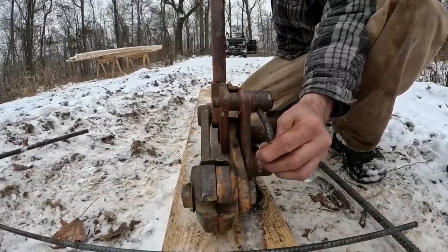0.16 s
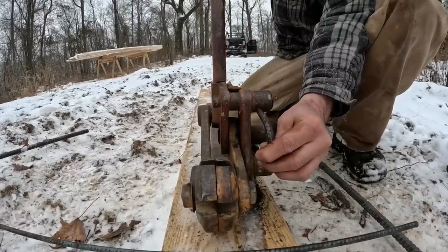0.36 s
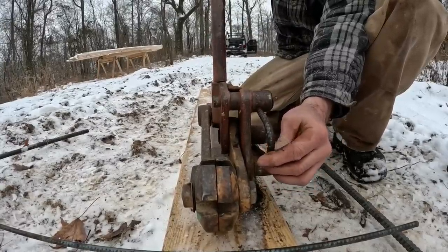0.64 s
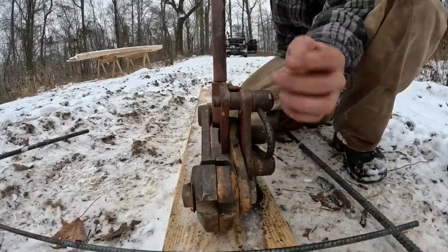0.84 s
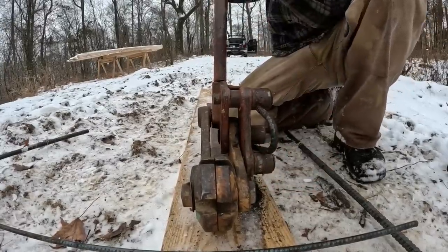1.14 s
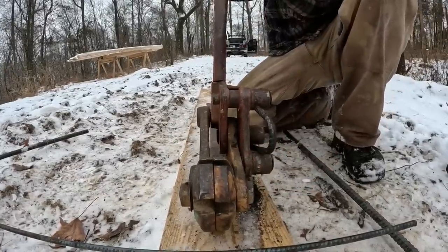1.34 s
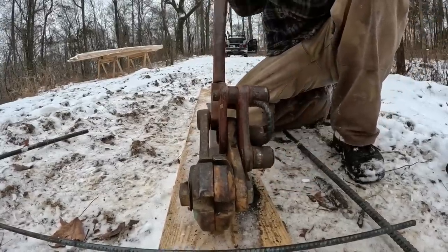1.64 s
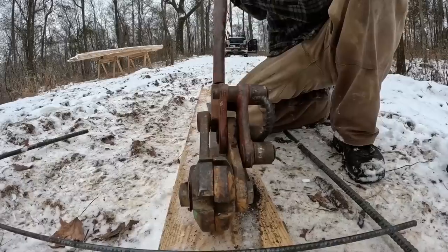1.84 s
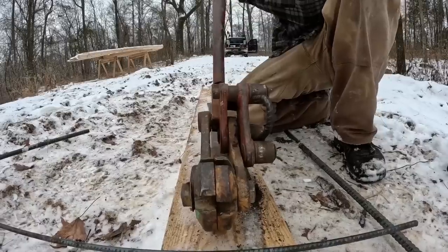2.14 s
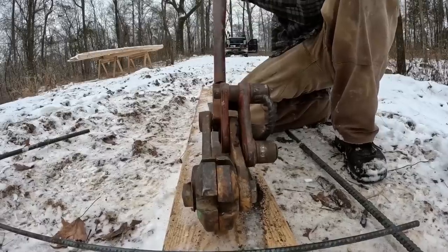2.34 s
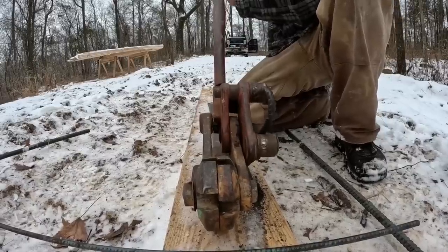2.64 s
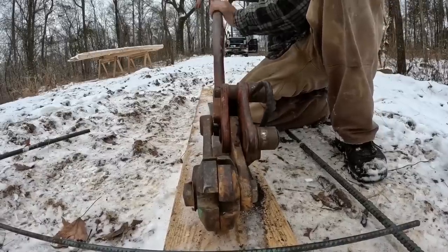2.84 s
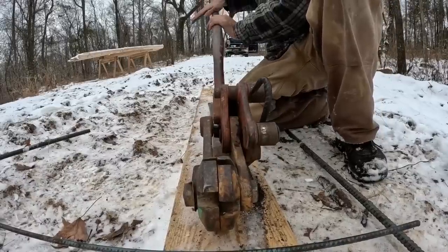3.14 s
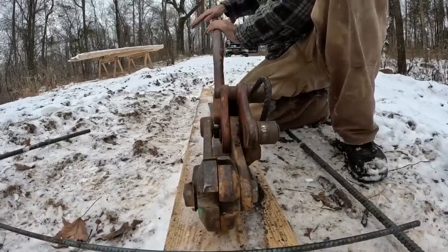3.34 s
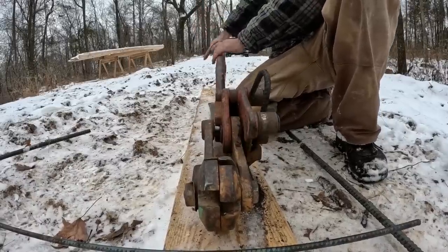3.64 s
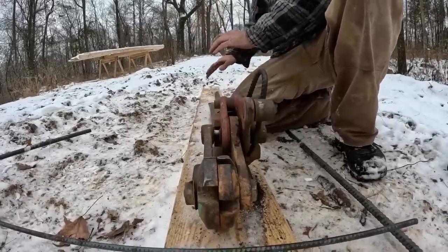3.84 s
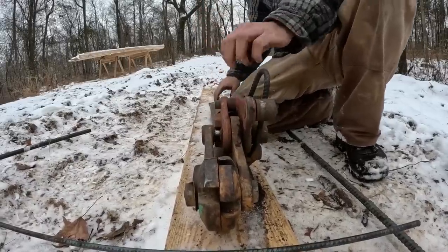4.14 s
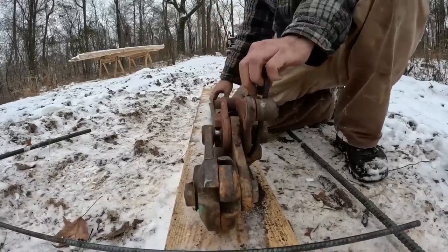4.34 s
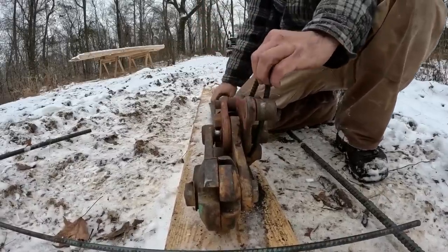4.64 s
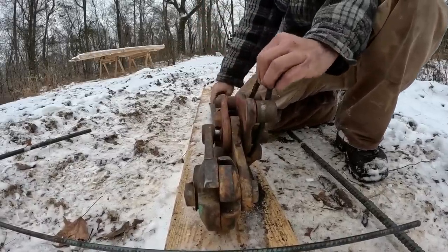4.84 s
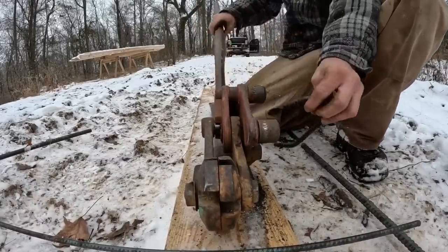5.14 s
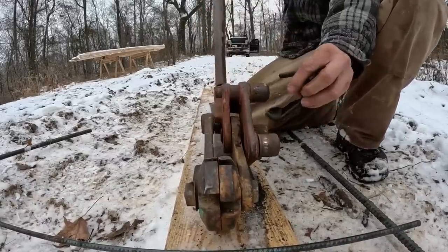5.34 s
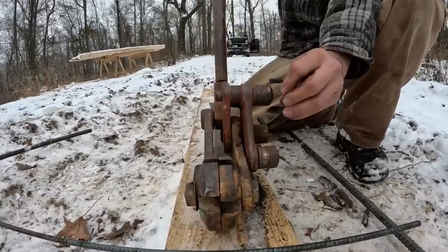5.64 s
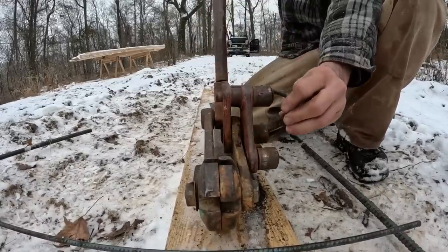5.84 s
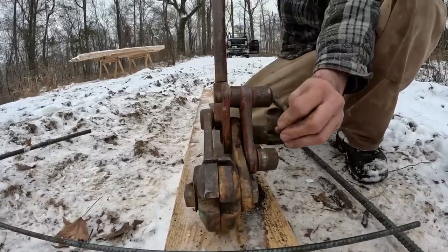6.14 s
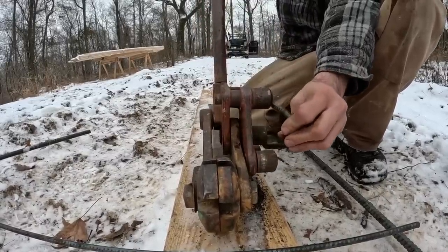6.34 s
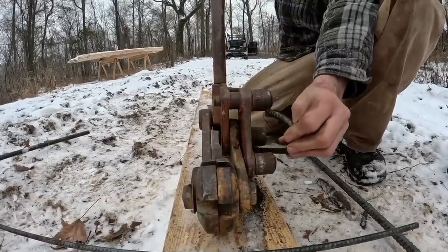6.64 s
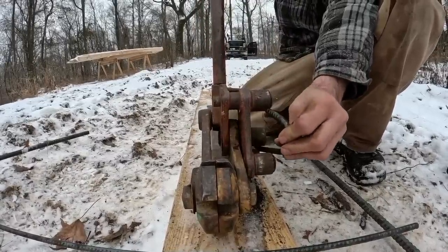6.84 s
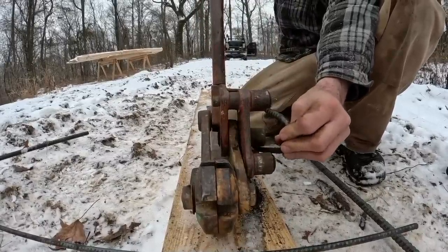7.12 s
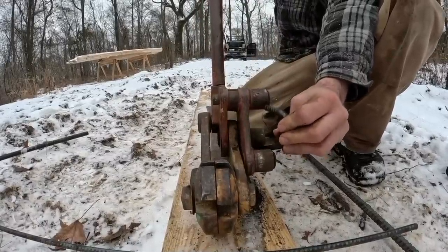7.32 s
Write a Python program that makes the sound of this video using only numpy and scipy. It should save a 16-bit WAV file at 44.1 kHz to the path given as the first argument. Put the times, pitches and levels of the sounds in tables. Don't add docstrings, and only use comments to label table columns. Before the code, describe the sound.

A close microphone beside a steel bender bolted to a plank on frozen ground, with a very faint open-air wash. From 0 to 1 s, light taps, woody creaks and dry rustling; a distant hoarse hawk scream falls at about 0.4-0.8 s. At 1.06 s a very loud steel crack hits with a plank knock and ground thump, followed by irregular jerks, rib ticks and grinding until 2.57 s, with another strong knock near 2.5. Friction continues low, fading by 3. From 3.55 to 3.9 s the lever drops: a loud burst of bouncing clatter, thumps, skid and short metallic ringing, with a faint tree echo. Quiet handling follows at 4.3-4.9 s, ending in a small clink and scrape. A clear metal knock comes at 5.52 s, a short far hawk call at 5.95, then soft clinks, uneven sliding on pins, grit snaps, taps and rustle until 7.4 s.

```python
import sys
import numpy as np
from scipy import signal
from scipy.fft import rfft, irfft
from scipy.io import wavfile
from scipy.ndimage import uniform_filter1d

SR = 44100
rng = np.random.default_rng(int(sys.argv[2]) if len(sys.argv) > 2 else 0)


def to_wav(sig):
    pcm = np.clip(np.atleast_2d(sig), -1, 1) * 32767
    pcm = np.round(pcm).astype(np.int16)
    wavfile.write(sys.argv[1], SR, pcm.T)


def level_to_linear(level):
    exponent = np.asarray(level, float) / 20
    return 10 ** exponent


N = 329868
T = np.arange(N) / SR

# [t/s, level/dB, strongest f/Hz]
BAR_KNOCKS = [(1.064, -6.5, 421), (1.088, -11.5, 281), (1.136, -14, 792), (1.154, -18.5, 844),
              (1.194, -23, 563), (1.292, -15, 873), (1.334, -23, 760), (1.368, -22.5, 804),
              (1.406, -18, 563), (1.626, -16.5, 558), (1.694, -10, 690), (1.86, -25, 666),
              (1.913, -17.5, 560), (1.984, -11.5, 616), (2.101, -20, 801), (2.119, -23.5, 542.5),
              (2.164, -19, 395), (2.281, -29.5, 640), (2.32, -14, 800), (2.397, -24, 546), (2.485, -7, 816),
              (2.517, -21, 792), (2.57, -24.5, 560)]
LEVER_BOUNCES = [(3.566, -19, 943.5), (3.581, -8, 868.7), (3.586, -7.5, 524.5), (3.609, -7, 262.7),
                 (3.653, -16.5, 619), (3.661, -7, 819), (3.727, -15, 741), (3.756, -9.5, 732.3),
                 (3.774, -10, 901.4), (3.788, -3, 808), (3.847, -21.5, 638), (3.907, -17.5, 825),
                 (3.914, -19.5, 354.6)]
HAND_TAPS = [(0.145, -34.5, 673.2), (0.868, -28.5, 856), (3.194, -37, 295.3), (4.504, -55, 690),
             (4.542, -48.5, 1056), (5.516, -29, 659), (5.561, -38, 834.5), (5.683, -63, 1080),
             (5.74, -56, 863), (6.128, -36.5, 712), (6.256, -38.5, 779), (6.52, -32, 768.5),
             (6.549, -32, 753), (6.64, -45, 793), (6.749, -27.5, 560), (7.118, -35.5, 684)]
# [t/s, level/dB, f/Hz]
CREAKS = [(0.168, -34.5, 696), (0.176, -26, 693), (0.195, -27, 685), (0.232, -37.5, 668), (0.554, -43, 702),
          (0.577, -49.5, 700), (0.66, -44, 691), (0.682, -43.5, 713), (0.725, -49.5, 715),
          (0.849, -38, 702), (0.932, -40.5, 805), (1.008, -39.5, 830), (1.11, -23.5, 750),
          (1.124, -22.5, 804), (1.228, -35, 820), (1.316, -30, 850), (1.34, -30.5, 795), (1.684, -25, 748),
          (1.701, -19.5, 797), (2.458, -22, 803), (6.733, -33, 617), (6.812, -37.5, 759)]
# [t/s, level/dB]
THUMPS = [(0.193, -44), (1.067, -19), (1.403, -39), (1.649, -44), (1.913, -40.5), (1.985, -37.5),
          (2.171, -37.5), (2.481, -36.5), (3.583, -17.5), (3.665, -23), (3.722, -20), (3.757, -29),
          (3.778, -18), (3.903, -23), (5.919, -47.5), (6.749, -46)]
# [f/Hz, level/dB, t60/s]
PLANK_MODES = [(252, -2.5, 0.039), (318, -5.5, .06), (372, 0.5, 0.043), (476, -9.5, 0.071),
               (560, 0.5, 0.048), (680.6, 0.5, 0.055), (772.4, -3, 0.078), (832.5, 0.5, 0.041),
               (1050, -18, 0.19)]
GROUND_MODES = [(84.4, -2, 0.47), (149, -3, 0.048), (185, -3.5, 0.21)]
GROAN_MODES = [(281, -3, 0.056), (742.8, 0.5, 0.041), (820, -0.5, .06)]

# [t/s, level/dB, ping/dB, treble/dB]
CRACKS = [(1.0626, 2, -25, -6.5), (1.0676, -1.5, -23, 2.5), (1.0906, -23.5, -18, 1.5),
          (3.467, -48, -12, -1.5), (3.5446, -47.5, -10, -1.5), (3.555, -35, -4.5, -2),
          (3.566, -18.5, -16.5, -8.5), (3.5768, -9, -14, -10), (3.5871, 3.5, -18.5, -4),
          (3.6606, -39.5, 7, -0.5), (3.7232, -30.5, -14, -20), (3.7414, -37.5, -7.5, -11),
          (3.7556, -28.5, -5.5, -27), (3.778, -19.5, -3.5, -13), (3.787, -1.5, -3.5, -17.5),
          (3.9048, -18, -3.5, -32)]
# [t/s, level/dB, ping/dB]
RIB_SLIPS = [(1.135, -27, -10.5), (1.1944, -33.5, 9), (1.293, -48, 13), (1.3339, -30.5, -4),
             (1.3688, -38, 12.5), (1.4051, -32.5, 2), (1.5905, -36.5, 4.5), (1.6242, -35, -5),
             (1.6943, -29, -12), (1.8592, -42.5, 16.5), (1.9095, -38.5, 5.5), (2.119, -33, 8),
             (2.164, -36.5, 3), (2.3203, -40.5, 7.5), (2.396, -33, 12), (2.471, -37.5, -3),
             (2.4843, -31.5, 1), (2.5676, -42, 8.5)]
PIN_TICKS = [(4.5067, -44, 1.5), (4.5422, -47, 4.5), (4.6119, -54.5, 8), (4.9235, -42.5, -12),
             (5.5159, -30, 5.5), (5.5609, -28.5, -3), (5.6817, -47.5, 8.5), (5.7375, -52.5, 13),
             (6.1317, -34, -17), (6.2573, -37, -4), (6.4126, -46, -7), (6.4544, -57, -11.5),
             (6.5192, -38, -10), (6.55, -31, -8.5), (7.1167, -48, -3)]
# [f/Hz, level/dB]
CRACK_COLOUR = [(710, -26), (1200, -11), (1720, -3), (2530, -8.5), (3180, -5), (4650, -15), (5180, -2.5),
                (6300, -6), (9010, -23), (10600, -2.5), (11700, -28.5), (14800, -26), (16000, -31.5)]
# [f/Hz, level/dB, t60/s]
ROLLER_MODES = [(1865, -3.5, 0.025), (2070, -6, 0.0017), (1200, -2, 0.013)]
HELD_BAR_MODES = [(800, -3, .014), (1150, -.1, .016), (1500, -3, .01), (2000, -4, .01)]
CLAMPED_BAR_MODES = [(2821, -4, 0.07), (4936, -13, 0.08), (6137, -22, 0.08), (7445, -5, 0.065),
                     (10230, 0, 0.08), (12870, -25, 0.08), (13770, -25, 0.07)]
LEVER_MODES = [(1626, 31.5, 0.033), (2480, -10, 0.13), (3130, -15, .2), (3930, -6.5, 0.16),
               (4270, -4, 0.11), (4850, -6.5, 0.17), (5771, -15.5, 0.1)]
PIN_MODES = [(2550, -2, .012), (3000, 0.5, .012), (3500, -5, 0.0075)]
# [t/s, level/dB, f/Hz, t60/s]
LONG_RINGS = [
    (1.066, -31, 11140, .12),
    (3.587, -55, 9420, .4),
]
# [t/s, level/dB, f/Hz, t60/s]
SINGLE_NOTES = [(0.168, -42, 1655, .08), (1.065, -15.5, 699, 0.026), (1.1355, -9, 780, 0.011),
                (3.467, -48.5, 5145, .02), (3.665, -50.5, 6933, 0.016), (3.7216, -7.5, 560, 0.012),
                (3.733, -49, 4793, 0.022), (3.742, -44, 6960, .02), (3.766, -30.5, 2718, .02),
                (3.777, -25.5, 2710, 0.046), (3.7922, -12, 400, 0.033), (3.793, -39, 5763, .03),
                (3.8, -45.5, 4974, .15), (3.81, -50.5, 4238, 0.12), (3.912, -58, 6300, 0.025),
                (3.95, -80.5, 7670, .3), (1.115, -57.5, 7600, 0.14), (1.35, -58, 4600, .3),
                (1.3, -32, 300, 0.047), (1.411, -29.5, 332.6, 0.055), (3.907, -20, 383.6, 0.066),
                (2.44, -26, 798, 0.055), (2.72, -37, 228.3, 0.089), (2.715, -33, 806.3, 0.069),
                (5.5172, -24.5, 1950, 0.027), (5.95, -49, 170, 0.1), (6.549, -39.5, 193.3, 0.05),
                (7.001, -58.5, 60, 0.19), (3.882, -34, 493.7, 0.03), (3.898, -28, 799, .02),
                (5.517, -26, 1160, .04), (5.741, -62, 4425, .2), (6.551, -52, 10250, 0.038),
                (6.636, -57.5, 10200, 0.038)]

# [t/s, second mode level/dB, then lowest, middle, fifth modes above it/dB]
CLINKS = [
    (4.924, -26.5, -27, -9.5, -2.5),
    (5.5171, -23, -28.5, -30.5, -13.5),
    (5.563, -42, -3, -7, -10),
    (5.7367, -69, 11.5, -2.5, 9),
    (6.41, -46.5, -18.5, -7, -25.5),
    (6.4546, -44.5, -27, -7, -13),
]
# [f/Hz, level/dB, t60/s]
STIRRUP_MODES = [(1314, -22, 0.21), (2363, -2, 0.16), (2864, -16, 0.31), (3268, -11, 0.1), (4425, 0, 0.09),
                 (6390, -27, 0.12), (7267, -39, 0.29), (9986, -31, 0.22), (10200, -24, 0.063),
                 (11040, -32, 0.3), (12960, -38, 0.11), (13800, -59, 0.12)]
RUBBED_MODES = [(2363, 0, .035), (2864, -1, .03), (3268, -3, .03), (4425, -8, .07), (6390, -21, .08),
                (7267, -22, .12), (10100, -22, .05), (11040, -22, .1), (12960, -26, .06)]
# [t/s, level/dB]
PIN_SLIDES = [
    [(4.865, -76), (4.88, -64), (4.92, -47), (4.93, -82)],
    [(6.07, -77), (6.09, -59), (6.13, -61), (6.17, -52), (6.205, -45.5), (6.228, -50), (6.24, -55.5),
     (6.275, -65)],
    [(6.4, -82.5), (6.415, -71.5), (6.48, -64), (6.53, -64), (6.56, -61)],
    [(6.62, -77.5), (6.64, -59.5), (6.67, -84.5)],
    [(6.68, -80), (6.76, -59.5), (6.86, -59), (6.93, -78)],
]
SLIDE_LOW_DB = [-7, 6.5, 0, -8, -13]

# [t/s, effort/dB]
EFFORT = [(0, -56.5), (.3, -66), (.5, -62.5), (.8, -59), (1.06, -47.5), (2.58, -44.5), (2.85, -46),
          (3.0, -58), (3.5, -58.5), (3.94, -58), (4.03, -64), (4.45, -93), (4.95, -65), (5.35, -66.5),
          (5.55, -55), (5.8, -67.5), (6.0, -63), (7.48, -64)]
# [t/s, length/s, plank/dB, air/dB, tilt/dB per octave]
DRAGS = [(0.157, 0.068, -40.5, -45, 2), (0.206, 0.063, -44.5, -53.5, 0.5), (0.802, 0.18, -54, -54, 3),
         (0.983, 0.14, -57.5, -55.5, 10.5), (1.903, 0.1, -36, -51, 9), (2.26, 0.096, -56, -62.5, 8),
         (3.756, 0.062, -17, -39, -2.16), (4.352, 0.04, -69.5, -60.5, -9.5),
         (4.485, 0.0604, -62.5, -64, -4), (4.757, 0.075, -53, -49.5, -12), (4.852, 0.092, -50, -50.5, -4),
         (5.166, 0.067, -91.5, -58.5, -1), (5.589, 0.0875, -58, -50.5, -3.5),
         (5.876, 0.086, -50.5, -48, -0.5), (6.054, 0.128, -58.5, -52, -5.5),
         (6.188, 0.051, -56.5, -50.5, -7), (6.59, 0.073, -48.5, -69.5, -3),
         (6.663, 0.15, -49, -55.5, -0.66), (6.709, 0.24, -44, -50.5, 1.25), (7.096, 0.057, -57.5, -67.5, 5),
         (7.282, 0.12, -55, -93, 4)]
# [f/Hz, level/dB]
SCRAPE_COLOUR = [(590, -34.5), (1000, -3.5), (1330, -3), (1610, -1.5), (2210, -6.5), (2740, -5),
                 (3720, -11), (6200, -12.5), (9110, -31), (10800, -21), (15000, -63.5)]
# [f/Hz, level/dB]
SKID_COLOUR = [(4000, -30), (8000, -1.5), (16000, 8)]
# [t/s, level/dB, centre f/Hz]
SPECKS = [(1.5457, -40.5, 5060), (1.688, -37.5, 4930), (1.8033, -42, 5270), (2.0217, -45, 4000),
          (2.0545, -46, 4460), (2.0723, -42, 4450), (2.3046, -43.5, 5000), (2.4133, -49, 4470),
          (2.5094, -48.5, 4000), (3.545, -45, 5000), (3.704, -44.5, 3500), (3.7888, -9.5, 4197),
          (3.897, -34, 2000), (4.3586, -60, 2500), (4.4421, -66, 6530), (4.4905, -49, 3000),
          (4.583, -59, 1200), (4.5967, -50.5, 1490), (4.63, -60, 1500), (4.6411, -58, 6510),
          (4.7602, -49, 1510), (5.5156, -26, 1200), (5.524, -27, 1200), (6.0843, -46.5, 3000),
          (6.1256, -38.5, 2800), (6.1624, -45, 2800), (6.1975, -36.5, 2800), (6.204, -38, 2760),
          (6.6355, -51, 4960), (6.6837, -53, 4020), (6.6987, -50, 5600), (6.8145, -43, 4540)]

# [t/s, f/Hz, level/dB]
HAWK_CALLS = [
    [(.44, 1136, -66), (.468, 1244, -63), (.52, 1145, -61), (.575, 1050, -59), (.7, 923, -76),
     (.83, 849.6, -67)],
    [(5.935, 1154, -64), (5.965, 1200, -58), (6.01, 1160, -62), (6.08, 1030, -57)],
]
# [f/Hz, level/dB]
THROAT = [(1720, -25), (1850, -9), (2250, -7), (2500, -2), (2650, -24), (3080, -24), (3250, -.5),
          (3600, 1.5), (3780, 0), (3900, -26), (4700, -20), (5600, -19), (6200, -30)]
# [f/Hz, level/dB]
AIR_COLOUR = [(18, -43.5), (30, -13), (95, -15.5), (172, 3.5), (413, -1), (894, -9.5), (1790, -7.5),
              (4070, -14), (8160, -32.5), (10600, -24), (14000, -37)]
TREE_COLOUR = [(700, -35), (1600, -7.0), (3500, -3.5), (7000, -21.5)]
# [f/Hz, level/dB]
MIC_RESPONSE = [(20, -19), (70, -6.5), (110, 3.5), (8450, 0.74), (8850, -11), (9150, -14.5), (9500, -1.5),
                (14000, -5.5), (16000, -14.5), (16400, -49.5)]

KNOCK_T60_S, BOUNCE_T60_S, TAP_T60_S, T60_PER_OCTAVE = 0.065, 0.058, 0.09, 0.65
CREAK_T60_S, CREAK_RISE_S = 0.1, 0.0016
DEEP_DB, DEEP_BOUNCING_DB, BOUNCING_S = -11, -33, (3.62, 6.0)
RIB_TOP_DB, TICK_TOP_DB, DULLING = -7.5, -30, 0.99
DANGLING_TOP_DB, GRIPPED_TOP_DB, SEATED_TOP_DB, GRIPPED_S = -16, -30, -8, (5.0, 6.0)
CHOKE_S = 0.028
CHATTER_DB, GROAN_DB = -1.5, -4.5
IDLE_SCRAPE_DB, IDLE_KNEE_DB, IDLE_RATIO = -1.62, -63, 0.3
JERK_DB, JERK_SCRAPE_DB, JERK_RATIO = -30, -54.5, 0.32
JERK_BEFORE_S, JERK_AFTER_S = 0.013, 0.0071
SPECK_T60_S, SPECK_FLANK_DB = 0.012, -21.5
AIR_DB = -68


def shaped(x, points):
    hz, db = np.transpose(points)
    bins_hz = np.arange(len(x) // 2 + 1) * SR / len(x)
    gain = level_to_linear(np.interp(np.log(bins_hz + 1), np.log(hz), db))
    y = irfft(rfft(x) * gain, len(x))
    return y / np.std(y)


def ring(modes, t, gains=1, stretch=1, shorten=1, rise=1e-5):
    hz, db, t60 = np.transpose(modes)[:, :, None]
    decay = 1000 ** (-t / (t60 * shorten))
    waves = level_to_linear(db) * gains * np.sin(2 * np.pi * hz * stretch * t) * decay
    return np.sum(waves, axis=0) * (1 - np.exp(-t / rise)) ** 2


def add(out, s, x, db):
    i = int(s * SR)
    out[i:i + len(x)] += (x * level_to_linear(db) / np.max(np.abs(x)))[:N - i]


def curve(tables, column, rest_db=-120):
    out = np.zeros(N)
    for rows in map(np.array, tables):
        out += level_to_linear(np.interp(T, rows[:, 0], rows[:, column], left=rest_db, right=rest_db))
    return out


def grit(rate_hz, spread_db, hiss):
    hits = rng.random(N) < rate_hz / SR
    clicks = hits * level_to_linear(spread_db * rng.standard_normal(N)) * rng.choice([-1, 1], N)
    patches = uniform_filter1d(np.repeat(rng.standard_normal(N // 400 + 1), 400), 400)[:N]
    x = (clicks / np.std(clicks) + hiss * rng.standard_normal(N)) * level_to_linear(2.8 * patches)
    return x / np.std(x)


def through(force, modes, shorten):
    y = signal.fftconvolve(force, ring(modes, T[:SR // 5], shorten=shorten, rise=0.0028))[:N]
    return y / np.std(y)


def knocks():
    out, t = np.zeros(N), T[:SR // 4]
    groups = (BAR_KNOCKS, KNOCK_T60_S), (LEVER_BOUNCES, BOUNCE_T60_S), (HAND_TAPS, TAP_T60_S)
    for rows, t60 in groups:
        for s, db, pitch_hz in rows:
            modes = PLANK_MODES + [(pitch_hz, 1.5, 0.065)]
            hz = np.array(modes)[:, :1]
            near = np.exp(-(np.log(hz / pitch_hz) / 0.66) ** 2) + 0.48
            place = level_to_linear(3 * rng.standard_normal(hz.shape)) * rng.choice([-1, 1], hz.shape)
            detune = 1 + 0.029 * rng.standard_normal(hz.shape)
            shorten = t60 * T60_PER_OCTAVE ** np.log2(pitch_hz / 700) / 0.083
            add(out, s - 0.001, ring(modes, t, near * place, detune, shorten, rise=0.00093), db)
    return out


def creaks():
    out, t = np.zeros(N), T[:SR // 4]
    for s, db, pitch_hz in CREAKS:
        notes = [(pitch_hz, 0, CREAK_T60_S), (pitch_hz * 1.07, -6, CREAK_T60_S)]
        add(out, s, ring(notes, t, rise=CREAK_RISE_S), db)
    return out


def thumps():
    out, t = np.zeros(N), T[:SR // 4]
    for s, db in THUMPS:
        bouncing = BOUNCING_S[0] < s < BOUNCING_S[1]
        deep_db, shorten = (DEEP_BOUNCING_DB, 0.55) if bouncing else (DEEP_DB, 1)
        gains = level_to_linear([[deep_db + 7.0], [0], [0]])
        detune = 1 + 0.059 * rng.standard_normal((3, 1)) * [[0.2], [1], [1]]
        add(out, s, ring(GROUND_MODES, t, gains, detune, shorten, rise=0.0014), db)
    return out


def cracks():
    out, t, lead = np.zeros(N), T[:4096], 0.012
    late = t - lead
    creep = 0.096 * np.exp(late / 0.0021)
    snap = 1000 ** (-late / 0.016) + 0.003 * np.exp(-t / 0.01)
    shape = uniform_filter1d(np.where(t < lead, creep, snap), size=30)
    ribs = [(s, db, ping_db, RIB_TOP_DB - DULLING * (db + 40)) for s, db, ping_db in RIB_SLIPS]
    ticks = [(s, db, ping_db, TICK_TOP_DB - DULLING * (db + 40)) for s, db, ping_db in PIN_TICKS]
    for hits, part in (CRACKS + ribs, ROLLER_MODES), (ticks, HELD_BAR_MODES):
        for s, db, ping_db, top_db in hits:
            low_db = min(ping_db + 12.5, 0)
            colour = [(hz, v + (top_db - 0.5) * np.clip(np.log2(hz / 3500), 0, 1.5) + (hz < 2300) * low_db)
                      for hz, v in CRACK_COLOUR]
            add(out, s - lead, shaped(rng.standard_normal(len(t)), colour) * shape, db)
            ping = ring(part, t, stretch=1 + rng.standard_normal() / 30, rise=0.00039)
            add(out, s, ping, db + ping_db)
    return out


def ringing_parts():
    out, t = np.zeros(N), T[:SR // 2]
    choke = np.exp(-np.maximum(t - CHOKE_S, 0) / 0.005)
    add(out, 1.066, ring(CLAMPED_BAR_MODES, t, rise=0.0031) * choke, -17)
    for s, db, part_hz, t60 in LONG_RINGS + SINGLE_NOTES:
        add(out, s, ring([(part_hz, 0, t60)], t, rise=0.00081), db)
    add(out, 3.787, ring(LEVER_MODES, t, rise=0.00017), -10)
    return out


def clinks():
    out, t, hz = np.zeros(N), T[:SR // 2], np.array(STIRRUP_MODES)[:, :1]
    tops_db = [DANGLING_TOP_DB, GRIPPED_TOP_DB, SEATED_TOP_DB]
    for s, db, low_db, mid_db, fifth_db in CLINKS:
        top_db = fifth_db + tops_db[np.searchsorted(GRIPPED_S, s)]
        between_db = (fifth_db + top_db) / 2 + 18.5
        lower_db = [low_db + 27, 0, mid_db + 9.5, mid_db + 13, fifth_db]
        gains = level_to_linear(lower_db + [between_db] * 2 + [top_db + 23.5] * 5)
        held = 1.1 if s < 5.54 else 0.6
        body = ring(STIRRUP_MODES, t, gains[:, None], shorten=held * (hz / 2400) ** -0.15, rise=0.0001)
        add(out, s, body, db + 20 * np.log10(np.max(np.abs(body))))
    return out


def pin_rub():
    force = grit(1500, 4.5, 0.5)
    upper = level_to_linear(1.5) * through(force, RUBBED_MODES, 1.0)
    upper += level_to_linear(CHATTER_DB) * through(force, PIN_MODES, 1.0)
    lowest = through(force, STIRRUP_MODES[:1], 1.0)
    pressure = curve(PIN_SLIDES, 1)
    firm = (pressure / level_to_linear(-53)) ** 0.89
    low_gain = sum(level_to_linear(db) * curve([rows], 1) for rows, db in zip(PIN_SLIDES, SLIDE_LOW_DB))
    return upper * pressure + lowest * firm * low_gain


def jerks():
    power = np.zeros(N)
    for s, db, pitch_hz in BAR_KNOCKS + LEVER_BOUNCES:
        span = slice(int((s - 0.3) * SR), int((s + 0.4) * SR))
        late = T[span] - s
        swell = np.exp(np.where(late < 0, late / JERK_BEFORE_S, -late / JERK_AFTER_S))
        power[span] += level_to_linear(2 * db) * min(pitch_hz / 520, 1) ** 4 * swell
    return np.sqrt(power)


def friction():
    force = grit(1200, 5.5, 0.5)
    rumble = through(grit(54, 1.9, 0.84), GROUND_MODES, 0.1)
    plank = through(force, PLANK_MODES[:-1], 0.75) + level_to_linear(-15.5) * rumble
    strained = through(force, PLANK_MODES[4:-1], 0.93)
    groan = through(force, GROAN_MODES, 1.0)
    dry = grit(3000, 4.5, 1.2)

    idle, jerk, knee = curve([EFFORT], 1), jerks(), level_to_linear(IDLE_KNEE_DB)
    rustle = level_to_linear(IDLE_SCRAPE_DB) * np.minimum(idle, knee * (idle / knee) ** IDLE_RATIO)
    jerk_scrape = level_to_linear(JERK_SCRAPE_DB) * jerk * (jerk + 0.06) ** (JERK_RATIO - 1)
    out = (level_to_linear(-1.5) * plank + level_to_linear(GROAN_DB) * groan) * idle
    out += strained * level_to_linear(JERK_DB) * jerk
    out += shaped(dry, SCRAPE_COLOUR) * (rustle + jerk_scrape)

    for s, length_s, plank_db, air_db, tilt_db in DRAGS:
        span = slice(int(s * SR), int((s + length_s) * SR))
        air = shaped(dry[span], [(hz, v + tilt_db * np.log2(hz / 2500)) for hz, v in SCRAPE_COLOUR])
        drag = level_to_linear(plank_db) * plank[span] + level_to_linear(air_db) * air
        out[span] += drag * signal.windows.tukey(len(air), 0.6)
    add(out, 3.766, shaped(dry[:2500], SKID_COLOUR) * signal.windows.tukey(2500), -37)
    return out


def specks():
    out, t = np.zeros(N), T[:1024]
    shape = 1000 ** (-t / SPECK_T60_S) * (1 - np.exp(-t / 0.0003))
    near_db, far_db = SPECK_FLANK_DB, 2.5 * SPECK_FLANK_DB
    for s, db, hz in SPECKS:
        colour = [(hz / 4, far_db), (hz / 2, near_db), (hz, 0), (hz * 2, near_db), (hz * 4, far_db)]
        add(out, s, shaped(rng.standard_normal(len(t)), colour) * shape, db)
    return out


def hawk():
    out = np.zeros(N)
    hoarse = uniform_filter1d(rng.standard_normal((2, N)), size=220) * np.sqrt(220)
    throat_hz, throat_db = np.transpose(THROAT)
    for rows in HAWK_CALLS:
        pitch = np.interp(T, *np.transpose(rows)[:2])
        phase = 2 * np.pi * np.cumsum(pitch * (1 + 0.004 * hoarse[0])) / SR
        partials = np.zeros(N)
        for k in range(2, 6):
            partials += level_to_linear(np.interp(k * pitch, throat_hz, throat_db)) * np.sin(k * phase)
        out += curve([rows], 2) * partials * level_to_linear(3.3 * hoarse[1])
    t = T[:SR // 4]
    trees = rng.standard_normal(len(t)) * np.exp(-t / 0.03) * level_to_linear(-37)
    return np.sqrt(2) * (out + signal.fftconvolve(out, trees)[:N])


def tree_line(near):
    spread = np.exp(-((T[:SR] - 0.28) / 0.11) ** 2)
    trunks = shaped(rng.standard_normal(SR), TREE_COLOUR) * spread
    return level_to_linear(-82) * signal.fftconvolve(near, trunks)[:N]


def open_air():
    return shaped(rng.standard_normal(N), AIR_COLOUR) * level_to_linear(AIR_DB)


def scene():
    near = knocks() + creaks() + thumps() + cracks()
    near += ringing_parts() + clinks() + pin_rub() + friction()
    return (near + tree_line(near) + specks() + hawk() + open_air())[None]


def low_pass(x):
    return signal.sosfilt(signal.butter(12, 16320, fs=SR, output="sos"), x)


def record(dry):
    heard = np.clip(shaped(dry[0], MIC_RESPONSE) * np.std(dry), -1, 1)
    lowpass = signal.butter(10, 16300, fs=SR, output="sos")
    heard = signal.sosfiltfilt(lowpass, heard)[None]
    return low_pass(heard)


dry = scene()
out = record(dry)
to_wav(out)
```